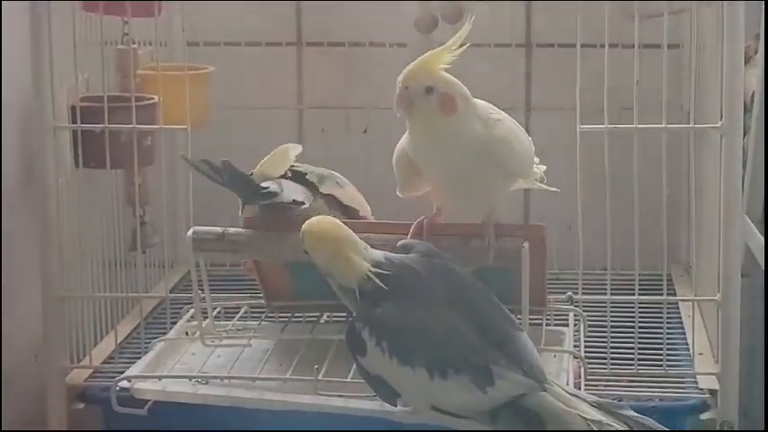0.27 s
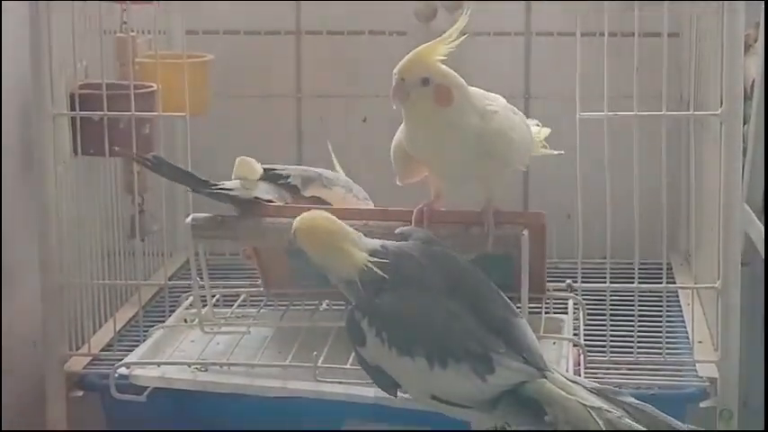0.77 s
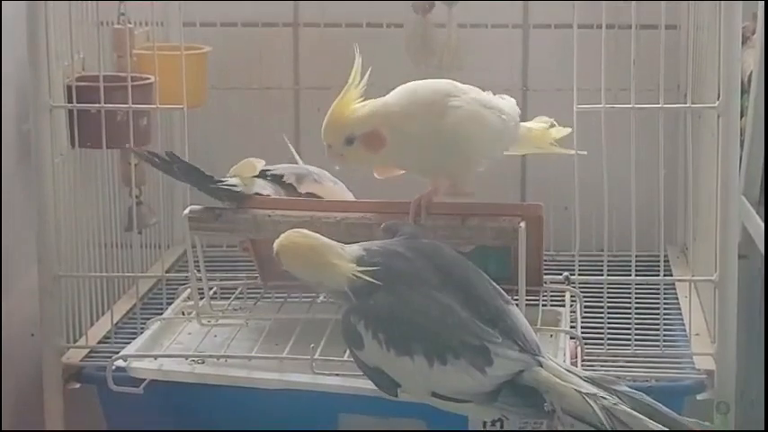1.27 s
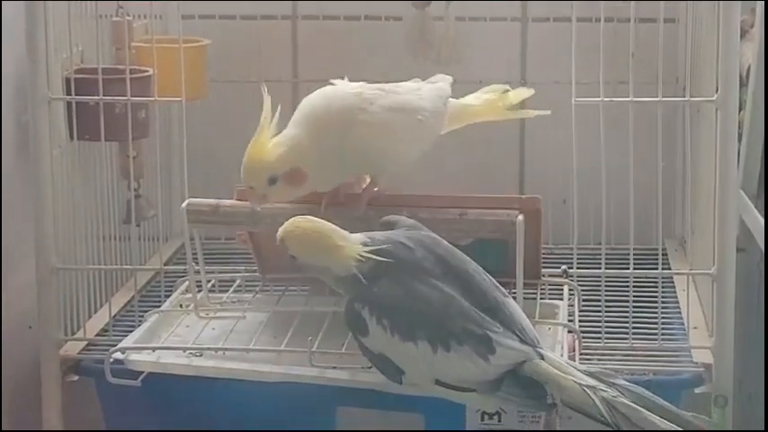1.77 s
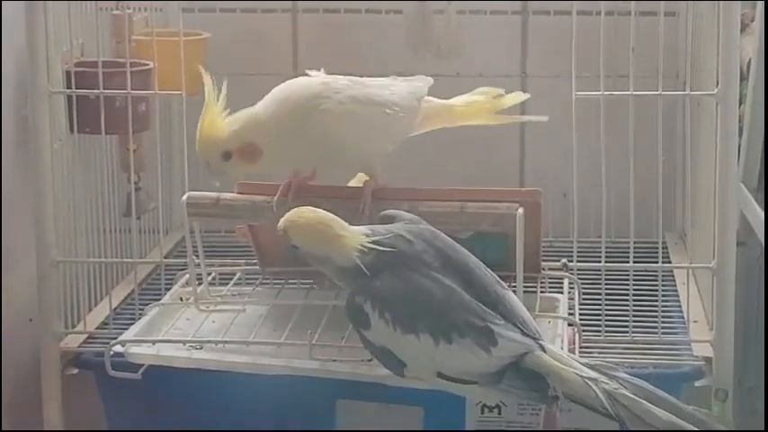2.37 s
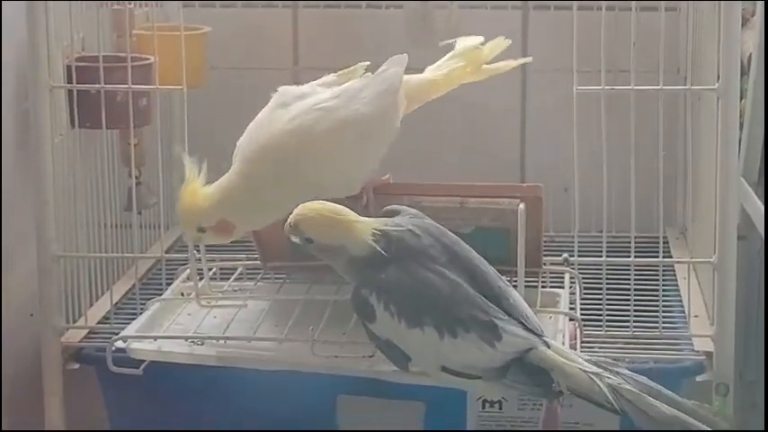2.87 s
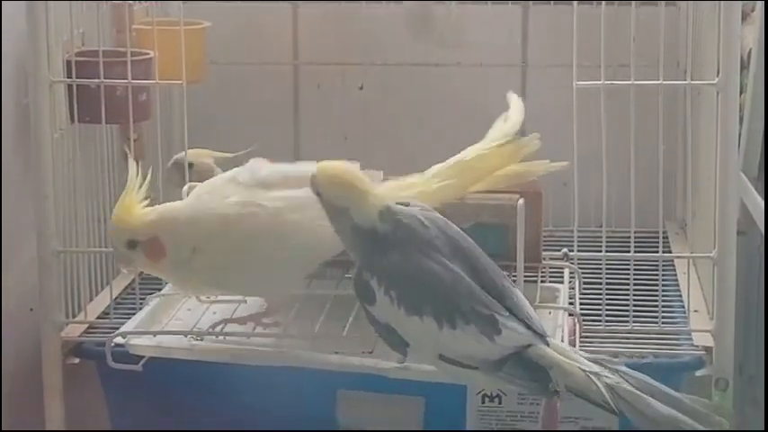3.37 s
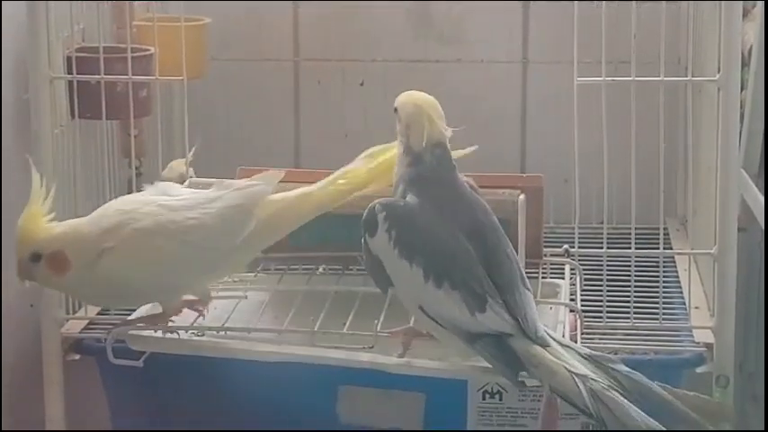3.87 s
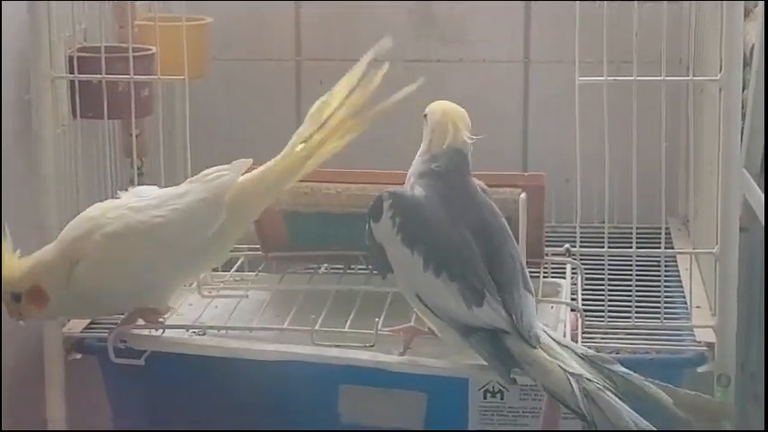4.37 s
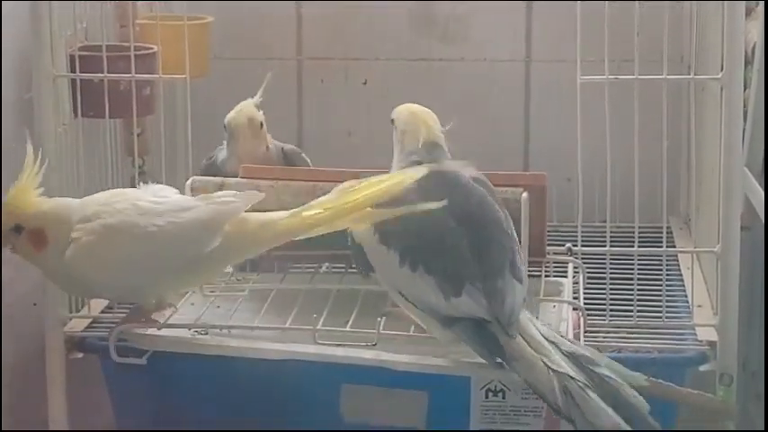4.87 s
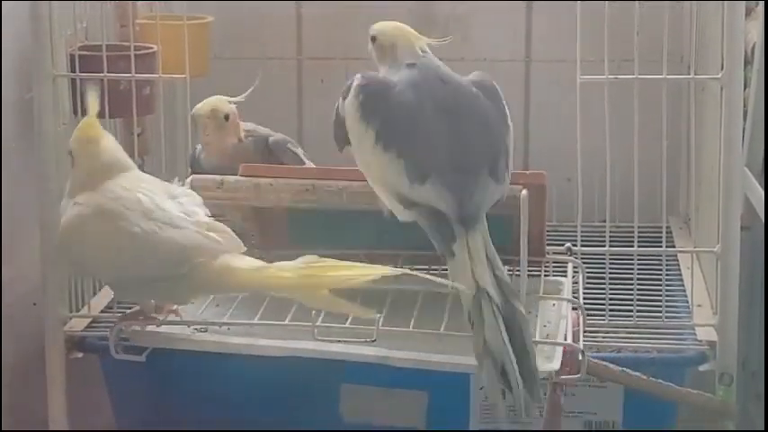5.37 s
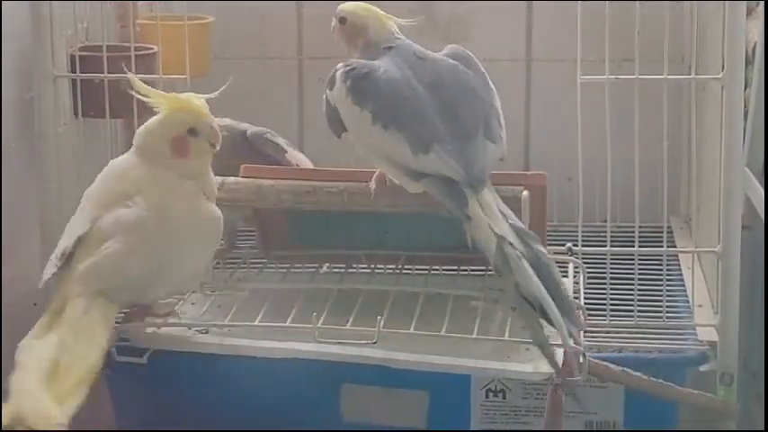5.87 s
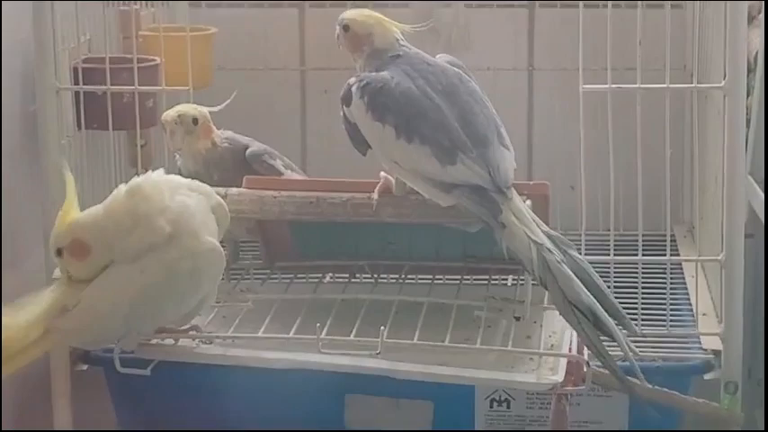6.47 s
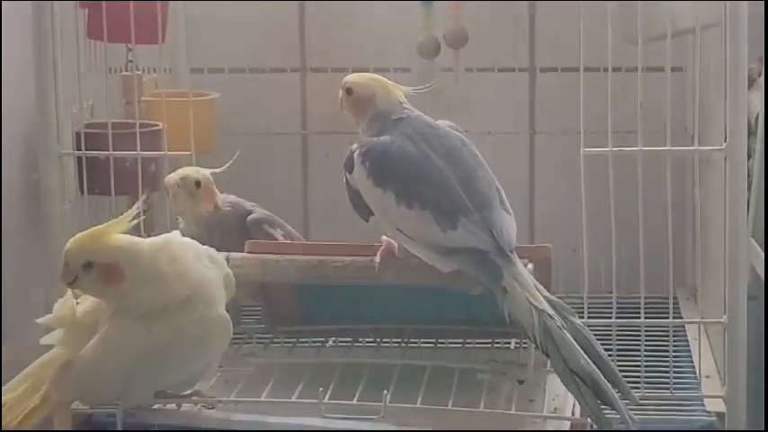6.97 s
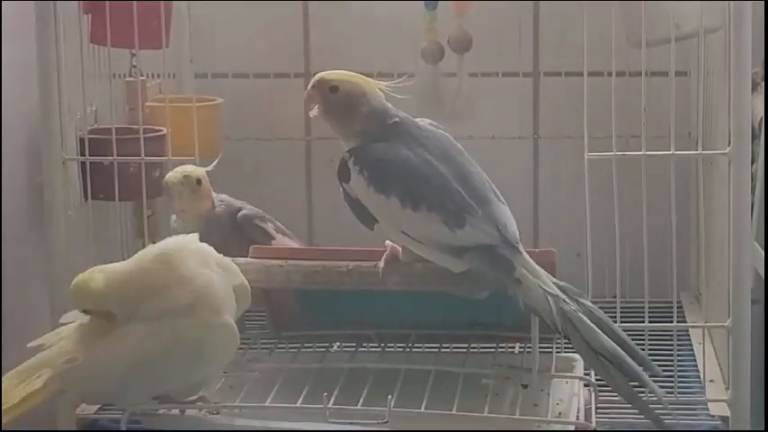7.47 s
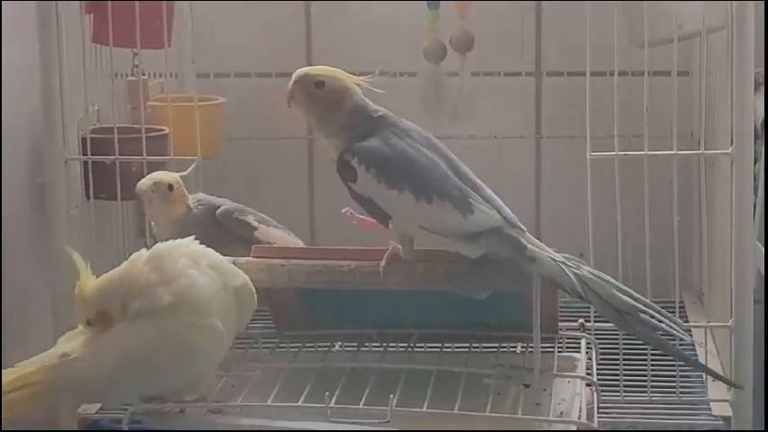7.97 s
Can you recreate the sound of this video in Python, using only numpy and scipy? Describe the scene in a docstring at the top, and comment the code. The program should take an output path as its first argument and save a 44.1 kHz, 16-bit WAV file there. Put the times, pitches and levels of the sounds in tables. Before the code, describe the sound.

Loud, clear cockatiel whistling with bright tile reverberation, harshly clipped on the right side and muffled, quieter on the left. Chirps leap up about an octave, whistles slide upward, then answers slur down. The middle is busiest, cycling through rasps, short bright squawks, throaty churrs and falling notes. Singing pauses while a cluster of dull knocks hits the microphone, then resumes with chirps. Steady low room rumble, wavering hum, faint whine and hiss lie behind.

```python
"""Cockatiel in a tiled room

A caged cockatiel sings in a small, echoing room: rising chirps, long slurred whistles, rasps and squawks.
Each note is a gesture of pitch and level: a lead-in, a glide and a hold, voiced as a few wavering harmonics.
The right microphone port overloads on the song; the left faces away, hearing it later and duller.
Behind it lie a motor's hum of wavering tones and filtered-noise room air and microphone hiss.
A hand bumps the camera now and then: damped sine thuds, stronger at one port or the other."""
import sys
import numpy as np
from scipy import signal
from scipy.fft import rfft, irfft, next_fast_len
from scipy.io import wavfile
from scipy.ndimage import uniform_filter1d, map_coordinates

SR = 44100
rng = np.random.default_rng(int(sys.argv[2]) if len(sys.argv) > 2 else 0)


def output_pcm(signal):
    """Save a mono or channel-first signal as 16-bit PCM at the path in sys.argv[1].

    Samples are clipped to [-1, 1] before scaling.
    """
    pcm = np.clip(np.atleast_2d(signal).T, -1, 1) * 32767
    wavfile.write(sys.argv[1], SR, np.round(pcm).astype(np.int16))


N = 362943
HISS_TOP_HZ = 15800  # upper edge of the room air and the microphone hiss


def amp(db):
    """Decibels to gain."""
    return 10 ** (np.asarray(db) / 20)


def unit(x):
    """Scale to rms 1."""
    return x / np.sqrt(np.mean(x ** 2) + 1e-20)


def along(points, hz):
    """Read (f/Hz, value) points on a log frequency axis."""
    f, v = np.transpose(points)
    return np.interp(np.log(hz + 1), np.log(f + 1), v)


def wobble(rate, size):
    """A smooth random curve with rate knots a second."""
    knots = rng.standard_normal(int(N * rate / SR) + 4)
    return map_coordinates(knots, [np.arange(size) * rate / SR])


def filtered(x, response):
    """Shape the spectrum of x by a response given as a function of frequency."""
    m = next_fast_len(N + SR // 2)
    spectrum = rfft(x, m) * response(np.fft.rfftfreq(m, 1 / SR))
    return irfft(spectrum, m)[..., :N]


def add(track, s, sound):
    """Mix a stereo sound into the track at time s."""
    part = track[:, max(round(s * SR), 0):][:, :sound.shape[1]]
    part += sound[:, :part.shape[1]]


# Colour of the room air, before its overall level is set: f/Hz, relative level/dB per Hz
AIR_COLOUR = [(15, -46), (25, -11), (49, -8.5), (87, -11.5), (117, -3), (152, -13), (184, -1), (391, -11),
              (435, -13.5), (698, -15), (1390, -28.5), (1510, -21), (2940, -30.5), (3350, -33),
              (4240, -31.5), (5510, -47), (9330, -120)]
# Likeness of the air at the two ports: f/Hz, correlation (-1 to 1)
AIR_LIKENESS = [(60, 0.29), (140, 1), (320, 0.78), (720, 0.42), (1650, -0.15), (3790, -0.036)]
# Balance of the air between the ports: f/Hz, left minus right level/dB
AIR_BALANCE = [(60, -5.5), (95, -2), (150, -3.5), (240, -2.0), (380, -5), (600, -4.5), (950, -6.5),
               (1510, -10.5), (2390, 8), (3790, -9.5)]


def air(level_db):
    """Steady room rumble and hiss: noise shared by both ports in the low mids, separate in the treble."""
    def colour(hz):
        # half the angle whose cosine is the likeness sets the mid and side gains
        turn = np.arccos(np.clip(along(AIR_LIKENESS, hz), -1, 1)) / 2
        return amp(along(AIR_COLOUR, hz)) * (hz < HISS_TOP_HZ) * [np.cos(turn), np.sin(turn)]

    def lean(hz):
        return amp(np.outer([.5, -.5], along(AIR_BALANCE, hz)))

    mid, side = filtered(rng.standard_normal((2, N)), colour)
    ports = np.array([mid + side, mid - side])
    return amp(level_db) * unit(filtered(ports, lean))


# Colour of the microphone hiss, before each port's level is set: f/Hz, relative level/dB per Hz
HISS_COLOUR = [(4000, -28), (5400, 15), (6300, 3.5), (7500, -7), (9500, 5), (12000, -5.5), (15500, -9)]


def hiss(left_db, right_db):
    """Each microphone port has its own faint, steady noise."""
    noise = filtered(rng.standard_normal((2, N)), lambda hz: amp(along(HISS_COLOUR, hz)) * (hz < HISS_TOP_HZ))
    return amp([[left_db], [right_db]]) * unit(noise)


def drone(lines, unsteady):
    """Steady tones with random wavering of strength and phase."""
    t = np.arange(N) / SR
    total = 0
    for hz, db, waver_hz in lines:
        waver = 1 + unsteady * (wobble(waver_hz, N) + 1j * wobble(waver_hz, N))
        tone = np.real(waver * np.exp(2j * np.pi * hz * t))
        total = total + amp(db) * unit(tone)
    return total


# Low hum of the motor, before the port gains: f/Hz, level/dB, waver rate/Hz
MOTOR_HUM = [(60.7, -36.5, 3.16), (186.8, -31.5, 10), (268, -52, 33)]
# Thin whine above the hum, before the port gains: f/Hz, level/dB, waver rate/Hz
MOTOR_WHINE = [(1184, -49, 12), (3305, -55, 30), (3429, -55, 30), (4081, -56, 60), (5640, -69, 160)]


def motor():
    """A motor in the room hums almost alike at both ports and whines mostly at the right one."""
    hum = drone(MOTOR_HUM, unsteady=0.61) * amp([[-1], [1]])
    whine = drone(MOTOR_WHINE, unsteady=0.37) * amp([[-14], [0]])
    return hum + whine


# Knocks on the camera: t/s, left level/dB, right level/dB
BUMPS = [(0.195, -10, -35), (2.091, -10, -34), (5.312, -8.5, -23.5), (6.223, -4.5, -19), (6.241, 6.5, -23),
         (6.314, 0.5, -39), (6.319, -2, -27), (6.369, -13, 17)]
# Resonances of the camera body: f/Hz, relative level/dB, t60/s
CAMERA_BODY = [(72, -16, .1), (132, 4, 0.022), (283, 8.5, 0.016), (508, -9.5, 0.017), (983, -6, 0.0074)]


def bumps():
    """A finger knocks the camera beside one port or the other: damped body resonances make a dull thud."""
    track, t = np.zeros((2, N)), np.arange(SR // 5) / SR
    soft_contact = 1 - np.exp(-t / 0.00073)
    for s, left_db, right_db in BUMPS:
        # each knock detunes the resonances a little
        detune = 1 + 0.03 * rng.standard_normal(len(CAMERA_BODY))
        thud = np.zeros(len(t))
        for (hz, db, t60), k in zip(CAMERA_BODY, detune):
            thud += amp(db - 60 * t / t60) * np.sin(2 * np.pi * hz * k * t)
        add(track, s, amp([[left_db], [right_db]]) * thud * soft_contact)
    return track


def gesture(s, lead_s, glide_s, hold_s, from_hz, to_hz, db, lead_hz=0, hold_hz=0, ease=1,
            swell_db=0, accent_db=0, step_db=0, late=1, fade_db=0):
    """Rows of (t/s, f/Hz, level/dB) for a note: the lead-in drifts by lead_hz and swells by swell_db;
    the glide starts with an accent, moves the pitch (ease over 1: fast at first) and
    steps the level to db (late over 1: mostly at its end); the hold drifts by hold_hz and fades."""
    edges = np.cumsum(np.abs([0, lead_s, glide_s, hold_s]))
    t = np.linspace(0, edges[-1], num=200)
    # progress through each stage, 0 to 1
    lead, glide, hold = (np.interp(t, edges[k:k + 2], [0, 1]) for k in range(3))
    glide_hz = (to_hz - from_hz) * (1 - (1 - glide) ** ease)
    hz = from_hz + lead_hz * (lead - 1) + glide_hz + hold_hz * hold
    accent = -accent_db * (lead < 1)
    level = db + swell_db * (lead - 1) + accent + step_db * (glide ** late - 1) - fade_db * hold
    return np.column_stack([s + t, hz, level])


def soft_notes(rows, attack_s, hold_s, release_s, sag_hz, depth_db):
    """Notes on one pitch that swell, hold and sag as they fade."""
    return [gesture(s, attack_s, hold_s, release_s, hz, hz, db,
                    hold_hz=-sag_hz, swell_db=depth_db, fade_db=depth_db)
            for s, hz, db in rows]


# Faint low whistles before the squawks: t/s, f/Hz, level/dB
LOW_NOTES = [(3.71, 1239, -21.5), (4.9, 1227, -22)]


def low_notes():
    """Faint steady whistles that swell and fade."""
    return soft_notes(LOW_NOTES, attack_s=0.017, hold_s=0.041, release_s=0.036, sag_hz=15, depth_db=3.5)


# Soft throaty churrs around the start of a falling note: t/s, f/Hz, level/dB
CHURRS = [(2.81, 793, -20), (4.04, 622, -18)]


def churrs():
    """Low throaty notes with a quick start and a slower release."""
    return soft_notes(CHURRS, attack_s=0.0066, hold_s=0.052, release_s=0.045, sag_hz=11, depth_db=9)


# A soft nasal peep: t/s, f/Hz, level/dB
PEEPS = [(2.595, 1445, -13)]


def peeps():
    """A short note that swells and sags as it fades."""
    return soft_notes(PEEPS, attack_s=0.016, hold_s=0.028, release_s=0.034, sag_hz=29, depth_db=10.5)


# Reedy falling answers to a whistle: t/s, knee f/Hz, fall/s, end f/Hz, knee level/dB, end level/dB
SLURS = [(1.041, 1921, .05, 1327, -9.5, -16), (7.73, 1960, .072, 1446, -8.5, -21.5)]


def slurs():
    """A loud start sags and weakens, drops by roughly a fourth and lingers softly at the bottom."""
    return [gesture(s, lead_s=.105, glide_s=fall_s, hold_s=.085, from_hz=knee_hz, to_hz=end_hz, db=end_db,
                    lead_hz=-200, hold_hz=-53, swell_db=-11.0, step_db=end_db - knee_db, fade_db=-0.5)
            for s, knee_hz, fall_s, end_hz, knee_db, end_db in SLURS]


# Hoarse falling notes: t/s, lead-in/s, f/Hz where the glide starts, level/dB where it ends
RASPS = [(2.355, .038, 2766, -1), (3.464, 0.016, 3072, -3), (4.681, .023, 3150, -6),
         (5.86, 0.0089, 2950, -12.5)]


def rasps():
    """The voice swells abruptly on a high pitch, tumbles, and slides away downward."""
    return [gesture(s, lead_s, glide_s=.024, hold_s=.072, from_hz=start_hz, to_hz=2024, db=db,
                    lead_hz=-70, hold_hz=-720, swell_db=10.5, step_db=7.0, fade_db=16)
            for s, lead_s, start_hz, db in RASPS]


# Bright buzzing squawks: t/s, final pulse rate f/Hz, level/dB
SQUAWKS = [(3.844, 462.6, -3), (5.028, 485, -3)]


def squawks():
    """A buzz starts abruptly, speeds up and dies away."""
    return [gesture(s, lead_s=0.0123, glide_s=0.0248, hold_s=0.069, from_hz=.9 * rate_hz, to_hz=rate_hz,
                    db=db, lead_hz=48.7, ease=1.6, swell_db=10, step_db=2.5, fade_db=15.5)
            for s, rate_hz, db in SQUAWKS]


# Clear falling notes: t/s, lead-in/s, lead-in drift f/Hz, fall/s, knee f/Hz, end f/Hz,
# knee level/dB, end level/dB
FALLS = [(2.19, 0.1, -150, 0.03, 2006, 1510, 1.5, -10), (2.825, .098, 279.5, .056, 1891, 1311, -7, -10),
         (4.11, 0.05, -81, 0.065, 1932, 1307, -8.5, -13.5),
         (5.274, .022, -60, .092, 2068, 1410, -1.5, -15.5)]


def falls():
    """A swelling tone tips over and falls ever faster toward the bottom of the voice, weakening as it goes."""
    return [gesture(s, lead_s, fall_s, hold_s=0.022, from_hz=knee_hz, to_hz=end_hz, db=end_db,
                    lead_hz=drift_hz, ease=.75, swell_db=6, step_db=end_db - knee_db, fade_db=13)
            for s, lead_s, drift_hz, fall_s, knee_hz, end_hz, knee_db, end_db in FALLS]


# Rising whistles: t/s, lead-in/s, climb/s, low f/Hz, top f/Hz, level/dB at the foot of the climb,
# top level/dB, fade over the hold/dB
WHISTLES = [(.732, 0.056, 0.16, 1332, 2520, -9.5, 1, 6.5), (1.825, .075, .118, 1279, 2167, -12, 2.5, 18.5),
            (3.1, .078, 0.12, 1389, 2519, -8.5, 3, 7.5), (4.325, 0.084, 0.11, 1383, 2576, -8, 1, 10),
            (5.475, .082, .12, 1360, 2556, -12, 2, 11), (7.405, 0.059, .156, 1337, 2558, -10, 1, 6)]


def whistles():
    """A low lead-in swells, climbs evenly, bursts out on reaching the top and creeps on upward there."""
    return [gesture(s, lead_s, climb_s, hold_s=.125, from_hz=low_hz, to_hz=top_hz, db=top_db,
                    lead_hz=40, hold_hz=118.7, ease=0.96, swell_db=6.5, accent_db=0.5,
                    step_db=top_db - low_db, late=1.63, fade_db=fade_db)
            for s, lead_s, climb_s, low_hz, top_hz, low_db, top_db, fade_db in WHISTLES]


# High chirps: t/s, lead-in/s, lead-in sag f/Hz, leap/s, low f/Hz, top f/Hz, top level/dB
CHIRPS = [(.432, 0.047, 98.6, 0.054, 1782, 3339, 3.5), (1.482, 0.053, 261, 0.078, 1608, 3216, 2.5),
          (7.125, .037, 69.3, .052, 1808, 3451, 6), (8.149, 0.043, 149.5, 0.071, 1676, 3136, 3.5)]


def chirps():
    """A soft, sagging lead-in, then a quick accented leap of about an octave to a loud top."""
    return [gesture(s, lead_s, leap_s, hold_s=.062, from_hz=low_hz, to_hz=top_hz, db=db,
                    lead_hz=-sag_hz, hold_hz=-52, ease=1.9, swell_db=2.0, accent_db=5.5,
                    step_db=14.5, late=0.94, fade_db=13.5)
            for s, lead_s, sag_hz, leap_s, low_hz, top_hz, db in CHIRPS]


# What throat and beak let through: f/Hz, level/dB
THROAT = [(4400, -2), (4900, -10.5), (5200, -0.5), (6000, -13), (7000, -39), (10000, -50)]


def syrinx(note, overtones_db, dull_db, jitter, shimmer_db, flutter_hz, buzz):
    """A gliding tone fluttering in pitch and strength; overtones dull by dull_db an octave above 2700 Hz."""
    s, hz, db = np.transpose(note)
    t = np.arange(s[0], s[-1], 1 / SR)
    glide = uniform_filter1d(np.interp(t, s, hz), size=400)
    pitch = glide * (1 + jitter * wobble(flutter_hz, len(t)))
    # in nasal and hoarse notes a second, slow vibration swings the phase by buzz radians, adding side bands
    slow_hz = 430 * (1 + 0.064 * wobble(132.6, len(t)))
    swing = buzz * np.sin(2 * np.pi * np.cumsum(slow_hz) / SR)
    phase = 2 * np.pi * np.cumsum(pitch) / SR + swing
    tone = np.sin(phase)
    for k, level in enumerate(overtones_db, 2):
        octaves_up = np.log2(np.maximum(k * pitch / 2700, 1))
        tone = tone + amp(level - dull_db * octaves_up) * np.sin(k * phase)
    fade = np.clip(np.minimum(t - t[0], t[-1] - t) / 0.0018, 0, 1)
    strength = amp(np.interp(t, s, db) + shimmer_db * wobble(flutter_hz, len(t)))
    voiced = unit(tone) * fade * strength
    throat = amp(along(THROAT, np.fft.rfftfreq(SR, 1 / SR)))
    return irfft(rfft(voiced, SR) * throat, SR)[:len(t)]


# Reverberation of the tiles: f/Hz, t60/s
TILES = [(1000, 0.81), (2000, 0.68), (3200, 0.59), (5000, 0.75), (10000, 0.15)]


def room(x, tail_db):
    """Direct sound, quick echoes and a long tail; random echo paths are drawn anew for each note."""
    hz, t, z = signal.stft(rng.standard_normal((2, SR)), SR, nperseg=256)
    decay = amp(-60 * t / along(TILES, hz)[:, None])
    tail = signal.istft(z * decay, SR, nperseg=256)[1][:, :SR]
    age = np.arange(SR) / SR
    early = amp(-6) * unit(rng.standard_normal((2, SR)) * amp(-60 * age / .13))
    build_up = 1 - np.exp(-age / 0.0068)
    paths = (amp(tail_db) * unit(tail * build_up) + early) / np.sqrt(SR)
    # the direct sound reaches the left port 17 samples after the right
    paths[[0, 1], [17, 0]] += amp(-4.5)
    return signal.fftconvolve(x[None], paths, axes=1)


# A squawk's harmonics 2 to 11 over its weak fundamental, in two humps: level/dB
SQUAWK_OVERTONES_DB = [-2.5, 10.5, 28, 28, 2, 8, 24, 24, 26, -2]
# The song as it reaches the left port, which faces away: f/Hz, level/dB
SHADOW = [(1200, -11), (2000, -17), (2700, -17.5), (3400, -23.5), (4500, -21), (7000, -19)]


def cockatiel():
    """The kinds of note differ in overtones and hoarseness; the left port hears them late and shadowed."""
    # jitter is a fraction of the pitch, buzz is in radians
    clear = dict(jitter=.014, shimmer_db=1.8, flutter_hz=160, buzz=0)
    reedy = dict(jitter=.019, shimmer_db=2, flutter_hz=320, buzz=0)
    harsh = dict(jitter=.019, shimmer_db=3.5, flutter_hz=380, buzz=0)
    nasal = dict(jitter=.03, shimmer_db=3, flutter_hz=380, buzz=.1)
    hoarse = dict(jitter=.05, shimmer_db=3.5, flutter_hz=400, buzz=.33)
    kinds = [(low_notes(), clear, dict(overtones_db=[-4], dull_db=0)),
             (churrs(), nasal, dict(overtones_db=[13, 20, 18], dull_db=56)),
             (peeps(), nasal, dict(overtones_db=[1, 12, 0], dull_db=9.5)),
             (slurs(), reedy, dict(overtones_db=[-12.5], dull_db=9)),
             (rasps(), hoarse, dict(overtones_db=[-5, -22], dull_db=15.5)),
             (squawks(), harsh, dict(overtones_db=SQUAWK_OVERTONES_DB, dull_db=-0.5)),
             (whistles(), clear, dict(overtones_db=[-14], dull_db=54.5)),
             (chirps() + falls(), clear, dict(overtones_db=[-17], dull_db=29.5))]
    song = np.zeros((2, N))
    for notes, texture, colour in kinds:
        for note in notes:
            start_s = note[0][0]
            voice = syrinx(note, **texture, **colour)
            add(song, start_s, room(voice, tail_db=-2.5))
    left = filtered(song[0], lambda hz: amp(along(SHADOW, hz)))
    return np.array([left, song[1]])


def scene():
    """Room air, microphone hiss and motor behind the bumps and the song."""
    background = air(level_db=-26.0) + hiss(left_db=-59.5, right_db=-53.0) + motor()
    return background + bumps() + cockatiel()


def record(dry):
    """The right port's loud song clips flat at full scale; the sound has no content above 16.8 kHz."""
    clipped = np.clip(dry, -1, 1)
    return filtered(clipped, lambda hz: hz < 16800)


dry = scene()
out = record(dry)
output_pcm(out)
```